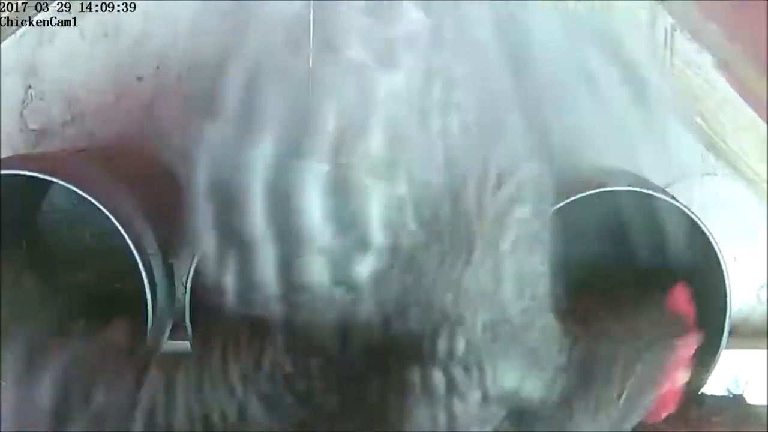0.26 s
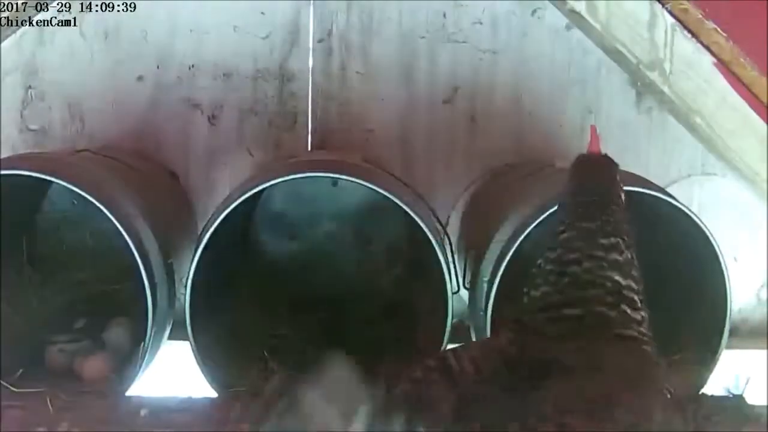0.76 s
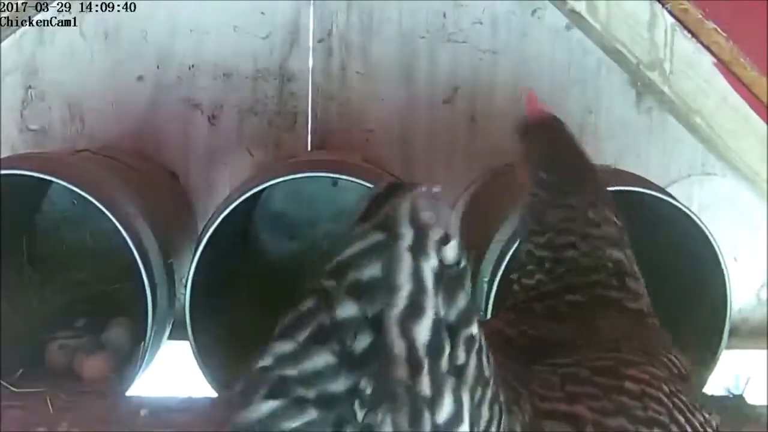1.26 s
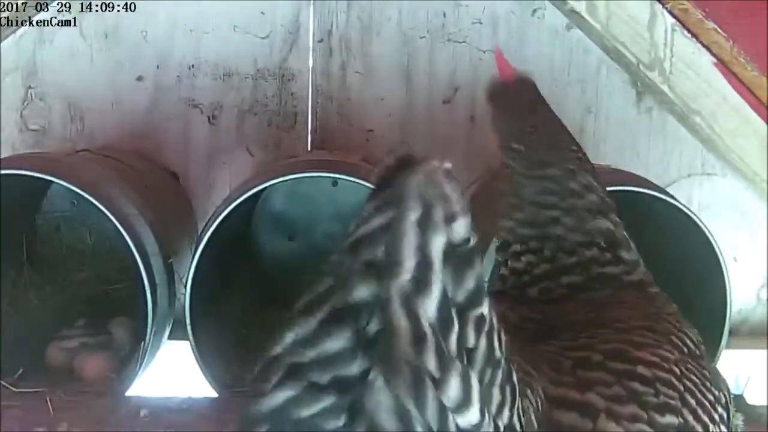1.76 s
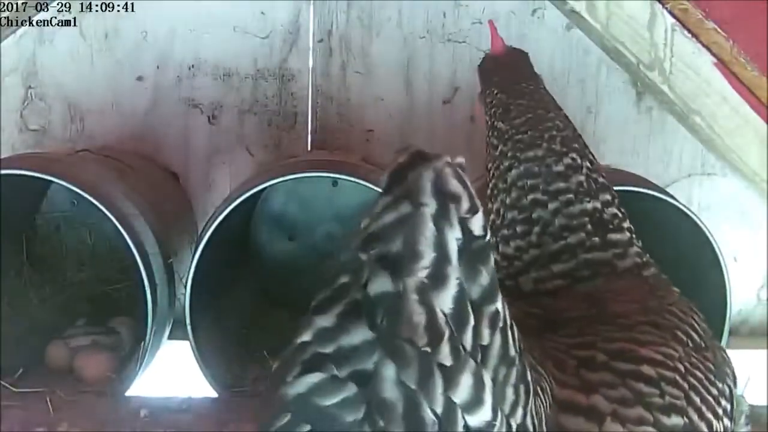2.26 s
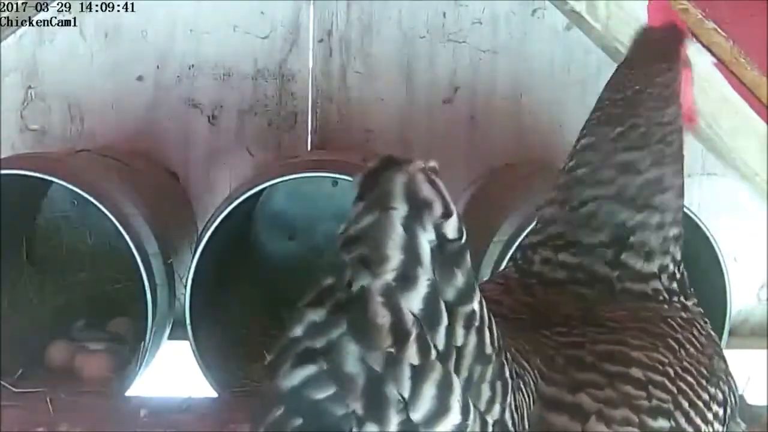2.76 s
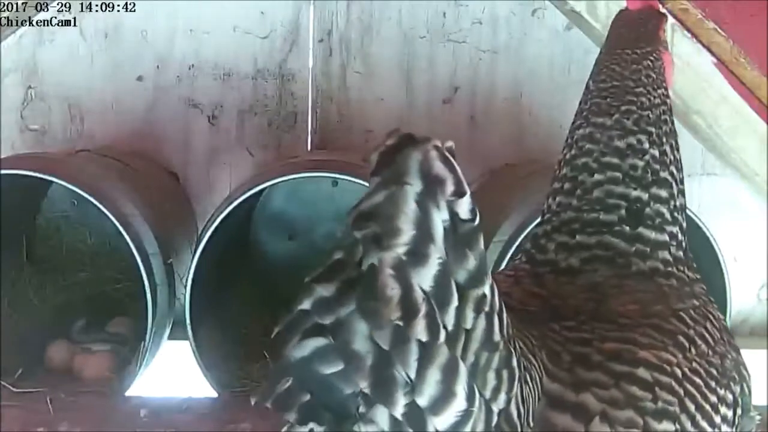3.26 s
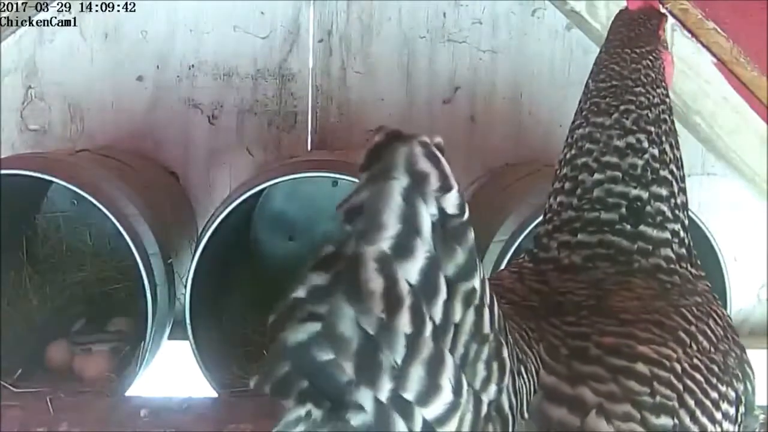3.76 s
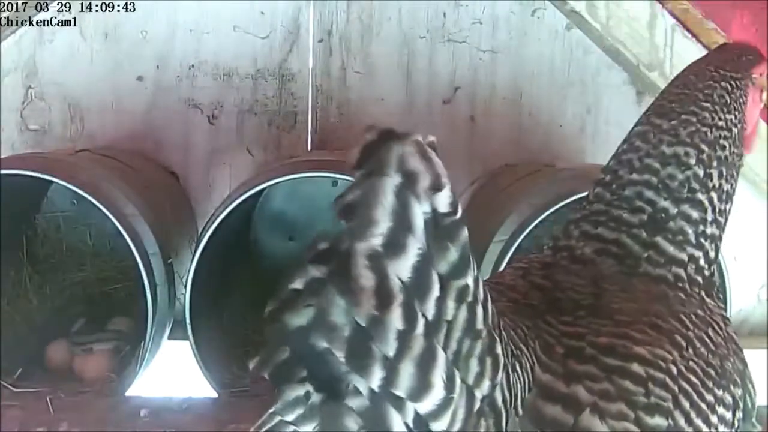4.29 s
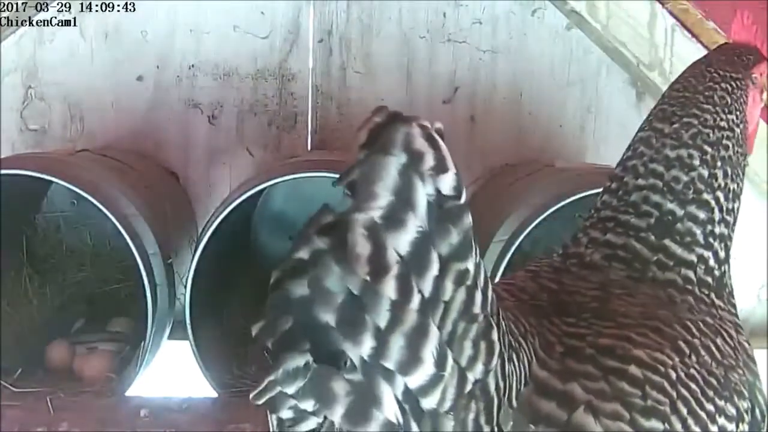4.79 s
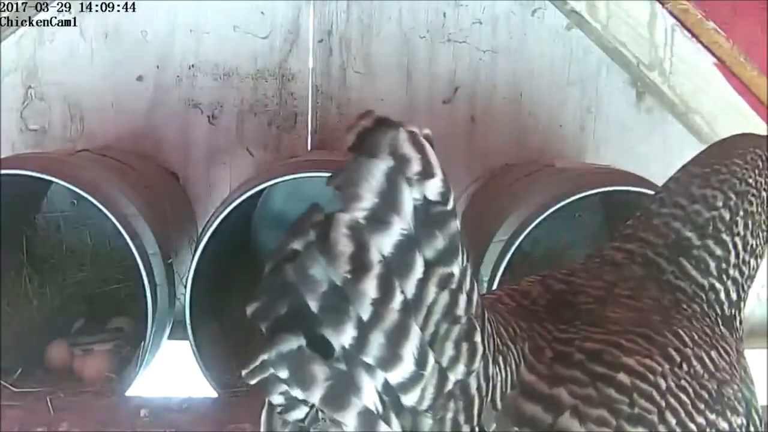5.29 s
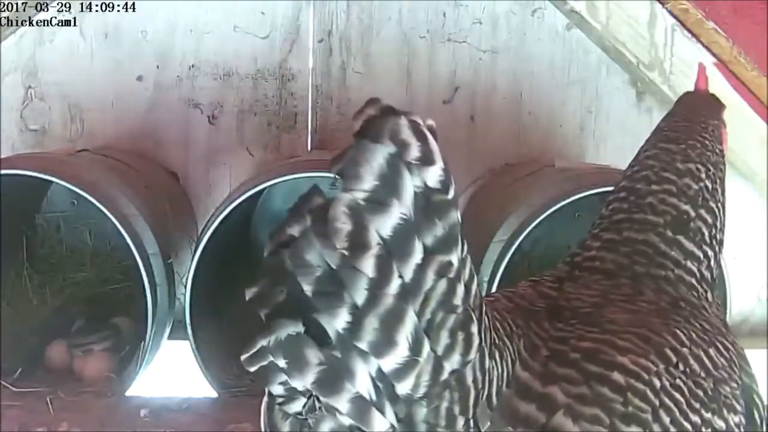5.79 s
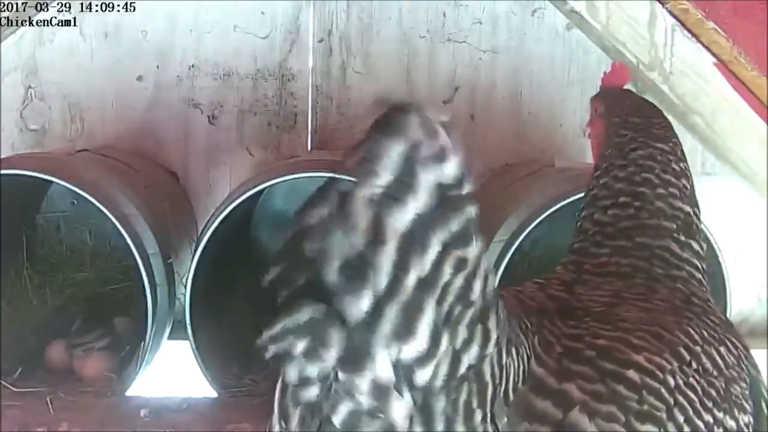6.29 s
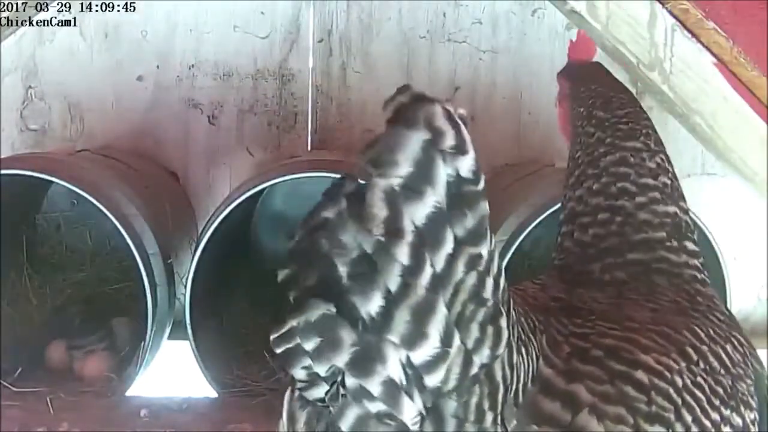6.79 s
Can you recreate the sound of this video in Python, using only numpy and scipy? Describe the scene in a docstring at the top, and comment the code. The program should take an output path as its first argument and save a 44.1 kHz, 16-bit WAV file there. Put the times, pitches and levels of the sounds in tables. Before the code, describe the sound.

In a small wooden coop, a hen close to a cheap microphone clucks about three times a second, with a loud squawk near the start. Another hen flaps past in the first second with thumps of air, feather rustle and claw knocks on wood. Brief dropouts chop the sound. Two more squawks come around the middle and near the end, while a distant bird whistles faintly over mains hum.

```python
"""Inside a small wooden coop, close to a network camera's one microphone, over mains hum and soft air noise:
a hen clucks from the start and squawks at 0.3 s, a buzz shaped by throat resonances; a second hen flaps past
until about 1.1 s, in air pulses and rustle, and claws knock on wood. From 1.3 s the stream stalls now and then,
a short mute; a squawk follows at 3.2 s, a far bird chirps in falling whistles from 3.8 to 5.9 s, and a last
squawk comes at 6.1 s. The loudest sounds overload the channel; clucks and stalls go on to the end."""
import sys
import numpy as np
from scipy import signal
from scipy.fft import rfft, irfft, next_fast_len
from scipy.io import wavfile
from scipy.ndimage import map_coordinates

SR = 44100
rng = np.random.default_rng(int(sys.argv[2]) if len(sys.argv) > 2 else 0)


def log_audio(samples):
    """Write samples as a 16-bit WAV file to the path given in sys.argv[1]."""
    # one column per channel
    frames = np.atleast_2d(samples).T
    # limit to full scale, then quantise
    limited = np.clip(frames, -1, 1)
    pcm = np.round(limited * 32767).astype(np.int16)
    wavfile.write(sys.argv[1], SR, pcm)


N = 310905
TIME = np.arange(N) / SR  # s

# Mains hum: (time [s], level [dB])
HUM_LEVEL = [(0, -61.5), (.41, -42), (.63, -28.5), (.82, -49.5), (1.6, -46.5), (2.26, -50), (2.96, -46),
             (4.2, -42.5), (4.75, -58.5), (5.42, -58), (7.05, -60.5)]
# Colour of the coop and yard noise: (frequency [Hz], relative level [dB per Hz])
AIR_COLOUR = [(35, -16.5), (60, -5.5), (114, -16), (194, -14), (254, -23.5), (575, -29), (957, -34),
              (1130, -27.5), (1320, -40.5), (1680, -29), (3480, -41), (4520, -73), (7660, -120)]
# Wild bird, far off: (time [s], peak level [dB])
CHIRPS = [(3.751, -57.5), (4.18, -51.5), (4.85, -59), (5.1, -52), (5.45, -51), (5.8, -50)]
# Pulses of air from the wings at the microphone: (time [s], pressure [full scale], half width [s])
WINGBEATS = [(.17, -0.014, 0.07), (0.479, 0.48, 0.0045), (.5, -0.18, 0.014), (0.647, 0.52, 0.0056),
             (0.666, -0.37, 0.0099), (0.799, -0.12, 0.018)]
# Air stirred past the microphone: (time [s], level [dB])
STIRRED_AIR_LEVEL = [(.08, -48.5), (.3, -49), (.43, -44), (.49, -29), (.562, -40), (.634, -26),
                     (.68, -38.5), (.834, -34), (.964, -51.5), (1.084, -35.5), (1.15, -61.5)]
# Feather rustle: (time [s], level [dB])
FEATHER_LEVEL = [(0.44, -32.5), (0.458, -33), (0.596, -41.5), (0.616, -24.5), (0.648, -36), (0.69, -44),
                 (0.7, -40)]
# Colour of the feather rustle: (frequency [Hz], relative level [dB per Hz])
FEATHER_COLOUR = [(150, -22), (250, -20), (424, -8), (590, -1), (1210, -4), (2070, 0.5), (3480, -19.5),
                  (4520, -42.5), (7660, -120)]
# Claws on the boards: (time [s], peak level [dB], decay by 60 dB [s])
CLAW_KNOCKS = [(.529, -18.5, 0.034), (.612, -13, 0.0287), (1.206, -41, 0.023)]
# Early ring of the boards: (frequency [Hz], decay by 60 dB [s])
COOP_DECAY = [(300, 0.043), (1000, 0.11), (2000, 0.098), (3500, 0.052)]
# Air mode of the open nest drums: (frequency [Hz], width [Hz], level [dB])
DRUM_MODE = (297, 24, -8.5)
# The hen's clucks, and the rough low endings of two squawks (3.343 and 6.2 s), before the shared course:
# (start [s], length [s], crest [dB], onset, first third and ending offsets [dB],
# upper resonance re lower [dB], its late change [dB], pitch [Hz], chest tone [dB], its late change [dB],
# roughness [0-1], mouth resonance [Hz])
CLUCKS = [ (-.085, .125, -13, 0, 0, -4, -8, 4, 275.6, -40, -0.5, .6, 1101),
          (0.164, .105, -10.5, 2, 2, 1, -9, 4.5, 289.3, -37, 2.5, 0.61, 1098),
          (.695, .115, -10.5, 1.5, 2, 1, -8, 4, 285.9, -38.5, 9, 0.82, 1113),
          (0.988, .11, -11, -2, -2.5, -5.5, -5.5, -3.5, 294.4, -28, -3, 0.7, 1032),
          (1.257, 0.12, -11.5, -1.5, -2.5, -4, -4.5, -1.5, 308.5, -26, -5.5, 0.55, 1071),
          (1.569, .11, -12, -1, -3, -1.5, -6.5, 0, 301.7, -24, -10, .62, 1067),
          (1.854, .112, -12.5, -3, -1, 1.5, -5.5, -6, 296.5, -25.5, 7, 0.6, 1069),
          (2.133, .117, -11, -1.5, -5, -1.5, -4.5, 3, 299.4, -24.5, 0, .5, 1065),
          (2.478, .14, -10, -2.5, -3, 1, -7.5, 3.5, 300.6, -25.5, -3.5, 0.6, 1056),
          (2.832, .112, -10.5, 0, -2.5, 1, -6, -1, 299.9, -27.5, 11, 0.39, 1044),
          (3.106, .117, -12, 0, -2.5, -5.5, -0.5, -0.5, 294, -24.5, -9.5, .6, 981),
          (3.343, .09, -12.5, 0, -7.5, -8.5, 5, -3.5, 292.5, -39, 14, .75, 1112),
          (3.887, .113, -15.5, 2.5, 0.5, 5, -0.5, 1.5, 299.1, -29.5, 13, 0.19, 987),
          (4.224, .138, -11.5, -2.5, -3.5, 1, -0.5, 0.5, 292.7, -25.5, -3.5, .5, 1000),
          (4.574, 0.12, -12.5, 0, -1, -1, -2.5, 1.5, 296, -30.5, 6, 0.83, 1017),
          (4.983, .111, -14.5, 0.5, 0, 2, -4.5, 4, 286.5, -23.5, 0.5, 0.54, 971.6),
          (5.278, .116, -16, 3.5, 1.5, 6.5, 1, -5, 301.3, -23.5, 1, 0.59, 989),
          (5.616, .109, -14, 2, 3.5, 2, -5.5, -0.5, 294, -26, 6.5, .42, 1009),
          (5.914, .125, -10.5, 0, -5, 1, -9, 7, 290.1, -25, -8, 0.86, 1014),
          (6.2, .09, -17, 0, 0.5, -4, -1.5, 1, 288.8, -33, 2, .55, 1079),
          (6.855, .104, -12, -1.5, -7, -4.5, -5, 1.5, 281.4, -33, 13.5, 0.2, 980), ]
# Course shared by those calls: (share of length [0-1], level re crest [dB], upper resonance change [dB],
# pitch [ratio], chest tone change [dB], added roughness [-], mouth resonance [ratio])
CLUCK_COURSE = [(0, -16, -2, .83, -13.5, .05, 1.0), (.11, -7.5, -3.5, .85, -11.5, .1, .99),
                (.33, 0.5, 0, .99, 1, -.12, .98), (.55, 0, 0, 1.01, -13, 0.12, 1.032),
                (.78, -7, -5.5, .96, -10, 0.22, 0.97), (1, -25.5, -7.5, .95, -22.5, 0.015, .99)]
# The three squawks, each a list of: (time [s], lower resonance [dB], upper resonance re lower [dB],
# pitch [Hz], roughness [0-1])
SQUAWKS = [
    [(.292, -15.5, 4, 568.4, .4), (.314, -3.5, -10, 619.4, .08), (.345, -5, -8, 631.8, .2),
     (.358, -6.5, -0.5, 610.5, .6), (.382, -10, 3, 602.8, .3), (.41, -11.5, 1, 606.2, .55),
     (.425, -23.5, -3, 590, 0.2), (.45, -19.5, -8, 562.2, 0.3)],
    [(3.235, -28, 5, 562, 0.2), (3.245, -15.5, 6.5, 546.7, 0.8), (3.263, -13.5, 9.5, 599.7, .2),
     (3.28, -11, 1, 583, 0.01), (3.3, -9.5, 2, 574.6, .05), (3.32, -11, 4, 573.5, .08),
     (3.35, -13.5, 4, 554.7, 0), (3.375, -17.5, 5.5, 515, 0.7)],
    [(6.084, -17.5, 1, 568.6, 0.3), (6.092, -14.5, 2.5, 572.3, 0.3), (6.12, -17, 10, 592.8, 0.02),
     (6.17, -12.5, 9, 574.6, 0.09), (6.18, -11.5, 5.5, 576.3, 0.4), (6.215, -13, 3, 555.3, 0.5),
     (6.24, -17.5, 2, 558, 0.4)],
]
# Chest tone of each squawk: (level re the whole voice [dB])
SQUAWK_CHEST_DB = [-20, -19.5, -16.5]
# Throat in clucks, as lower, upper and top resonance, each a list of: (centre [Hz], width [Hz], level [dB]);
# lower centres count from the mouth resonance, top centres from the FACING frequency
CLUCK_THROAT = [(-86, 210, 9), (172, 430, 2), (-400, 350, -8)], [(2079, 130, 4.5), (1939, 620, 1),
                (2344, 150, -6.5)], [(0, 530, 12), (830, 170, -20)]
# Throat in squawks, laid out likewise: (centre [Hz], width [Hz], level [dB])
SQUAWK_THROAT = [(0.0061, 470, 0)], [(2310, 270, 10.5), (1700, 590, 4)], [(-550, 380, -1.5), (101, 190, 1)]
# The head turns: (time [s], top resonance re lower [dB], top resonance centre [Hz])
FACING = [(0, -22, 3089), (.4, -24, 3460), (0.999, -22, 3218), (1.6, -20, 3207), (2.15, -20.5, 3118),
          (2.249, -20, 2817), (2.9, -23, 3050), (3.3, -26.5, 3460), (4, -19.5, 2700), (4.7, -18.5, 2734),
          (5.3, -24, 2837), (5.7, -21.5, 3072), (6.2, -20.5, 3400), (7, -31, 2693)]
# Stalls of the camera's stream: (start [s], end [s])
STALLS = [(1.343, 1.401), (2.303, 2.361), (2.485, 2.543), (3.924, 3.982), (4.284, 4.342), (4.583, 4.641),
          (4.823, 4.881), (6.743, 6.801), (6.983, 7.041)]

AIR_DB = -51.5  # centre of the wavering air level
UNEVEN_DB = 1  # random departure of each cluck from the shared course
ONSET_SHARE, THIRD_SHARE, TOP_SHARE, END_SHARE = 0.088, .33, .55, .78  # shares of a cluck's length
SQUAWK_MOUTH = 2.01  # mouth resonance as a multiple of the pitch
PITCH_JITTER = .04  # relative pitch waver at full roughness
ATTACK_S, RELEASE_S = .003, .0033
CONVERTER_HZ = 8000  # sample rate of the camera's converter
VOICE_BAND_HZ, TOP_HZ = 3804, 15700  # upper limits of the voice channel and of the output


def amp(db):
    """Gain of a level in dB."""
    return 10 ** (np.asarray(db) / 20)


def unit(x):
    """x at rms 1."""
    return x / np.sqrt(np.mean(x ** 2) + 1e-20)


def along(points, hz):
    """Value at hz of (Hz, value) points joined on a log frequency axis."""
    f, v = np.transpose(points)
    return np.interp(np.log(hz + 1), np.log(f + 1), v)


def level(rows):
    """Gain per sample of a (s, dB) curve, at -150 dB outside it."""
    s, db = np.transpose(rows)
    return amp(np.interp(TIME, s, db, -150, -150))


def wobble(rate, size=N, count=1):
    """Smooth random curves with rate knots a second."""
    knots = rng.standard_normal((count, int(size * rate / SR) + 4))
    position = np.arange(size) * rate / SR
    return np.squeeze([map_coordinates(row, [position]) for row in knots])


def filtered(x, response):
    """x shaped by a response given as a function of frequency."""
    m = next_fast_len(len(x) + 8192)
    spectrum = rfft(x, m) * response(np.fft.rfftfreq(m, 1 / SR))
    return irfft(spectrum, m)[:len(x)]


def noise(gain, size=N):
    """Coloured noise of rms 1."""
    return unit(filtered(rng.standard_normal(size), gain))


def resonances(modes, hz):
    """Summed gain of steep (Hz, width Hz, dB) resonances."""
    total = 0
    for centre_hz, width_hz, db in modes:
        bell = 1 / (1 + (2 * (hz - centre_hz) / width_hz) ** 2)
        total = total + amp(db) * bell ** 1.5
    return total


def add(into, sound):
    """Mix a sound into the start of a longer one."""
    into[:len(sound)] += sound


def background():
    """Mains hum wavering in level and phase, over soft air noise of drifting level."""
    phase = 2 * np.pi * 49.8 * TIME + 0.29 * wobble(4.2)
    hum = np.sqrt(2) * level(HUM_LEVEL) * amp(1.2 * wobble(18)) * np.sin(phase)
    air = amp(AIR_DB + 2.7 * wobble(3.6)) * noise(lambda f: amp(along(AIR_COLOUR, f)))
    return hum + air


def far_bird():
    """Short falling whistles whose pitch flutters fast, so that they sound hoarse."""
    out = np.zeros(N + SR)
    t = np.arange(int(.13 * SR)) / SR
    swell = np.sin(np.pi * t / t[-1]) ** 0.68
    for s, db in CHIRPS:
        hz = 2400 - 5500 * t + 70 * wobble(160, size=len(t))
        whistle = np.sin(2 * np.pi * np.cumsum(hz) / SR)
        add(out[round(s * SR):], amp(db) * swell * whistle)
    return out[:N]


def wings():
    """Each beat sends a pulse of air at the microphone; stirred air rumbles and feathers rustle."""
    pushes = sum(size * np.exp(-((TIME - s) / half) ** 2) for s, size, half in WINGBEATS)
    stirred = level(STIRRED_AIR_LEVEL) * noise(lambda f: (f > 40) / (1 + (f / 150) ** 2))
    feathers = amp(1.8 * wobble(60)) * noise(lambda f: amp(along(FEATHER_COLOUR, f)))
    return pushes + stirred + level(FEATHER_LEVEL) * unit(feathers)


def claws():
    """Dry little knocks on wood: bursts of resonant noise that die away exponentially."""
    out = np.zeros(N)
    t = np.arange(SR // 10) / SR
    for s, peak_db, t60 in CLAW_KNOCKS:
        tick = noise(lambda f: resonances([(1088, 900, 0), (2108.4, 2300, -2)], f), size=len(t))
        # the rms of the tick starts 8.5 dB below the peak level
        decay = amp(peak_db - 8.5 - 60 * t / np.clip(t60, .01, .06))
        add(out[round(s * SR):], decay * tick)
    return out


def coop(x, ring_db):
    """Close boards answer fast above the bass; a weaker ring six times as long follows."""
    hz, t, z = signal.stft(rng.standard_normal(SR // 2), SR, nperseg=256)
    t60 = along(COOP_DECAY, hz)[:, None]
    decay = amp(-60 * t / t60) + amp(ring_db - 60 * t / (6 * t60))
    tail = signal.istft(z * decay, SR, nperseg=256)[1]
    tail = filtered(tail, lambda f: 1 / (1 + (450 / (f + 1)) ** 6))
    delayed = np.pad(x, (150, 0))  # samples, about 3.4 ms
    return signal.fftconvolve(delayed, tail / np.linalg.norm(tail))[:N]


def drums(x):
    """The open nest drums hum along at their one low air mode."""
    centre_hz, width_hz, db = DRUM_MODE

    def mode(f):
        damping = 1j * f * width_hz
        return amp(db) * damping / (centre_hz ** 2 - f * f + damping)
    return filtered(x, mode)


def held_up(s):
    """Seconds lost in stalls that have ended by time s."""
    return sum((end - start) * (s >= end) for start, end in STALLS)


def cluck_course(start, length, crest_db, onset_db, third_db, end_db, upper_db, upper_late_db,
                 hz, chest_db, chest_late_db, rough, mouth_hz):
    """The shared course of throat and syrinx, stretched and set to this call's voice, a little uneven."""
    share, db, upper, pitch, chest, rougher, mouth = np.transpose(CLUCK_COURSE)
    own_shares = [ONSET_SHARE, THIRD_SHARE, TOP_SHARE, END_SHARE]
    own_db = np.interp(share, own_shares, [onset_db, third_db, 0, end_db])
    late = np.interp(share, [THIRD_SHARE, TOP_SHARE], [0, 1])
    uneven = UNEVEN_DB * rng.standard_normal((2, len(share)))
    lower_course = crest_db + db + own_db + uneven[0]
    upper_course = upper_db + upper + late * upper_late_db + uneven[1]
    chest_course = chest_db + chest + late * chest_late_db
    return np.transpose([start + length * share, lower_course, upper_course, hz * pitch,
                         chest_course, rough + rougher, mouth_hz * mouth])


def squawk_course(rows, chest_db):
    """Chest tone follows the level of the whole voice, and the mouth resonance follows the pitch."""
    s, low_db, upper_db, hz, rough = np.transpose(rows)
    whole_db = low_db + 10 * np.log10(1 + amp(upper_db) ** 2)
    return np.transpose([s, low_db, upper_db, hz, whole_db + chest_db, rough, SQUAWK_MOUTH * hz])


def call(rows, throat):
    """The syrinx buzzes at the pitch; as it roughens, cycles waver and break into flickering half-pitch partials."""
    s, *cols = np.transpose(rows)
    t = np.arange(s[0], s[-1], 1 / SR)
    low_db, high_db, hz, chest_db, rough, mouth_hz = [np.interp(t, s, c) for c in cols]
    turn_s, *turns = np.transpose(FACING)
    top_db, top_hz = [np.interp(t, turn_s, c) for c in turns]
    rough = np.clip(rough, 0, 1)
    wavering_hz = hz * (1 + PITCH_JITTER * rough * wobble(120, size=len(t)))
    phase = 2 * np.pi * np.cumsum(wavering_hz) / SR

    # partials at 1.5, 2, 2.5... times the pitch; the chest tone is the fundamental
    k = np.arange(3, 2 + CONVERTER_HZ // min(hz))[:, None] / 2
    start = rng.uniform(0, 2 * np.pi, k.shape)
    steady = (k % 1 == 0) * np.cos(k * phase + start)
    flicker = wobble(.4 * np.mean(hz), size=len(t), count=len(k)) * np.sin(k * phase + start)
    out = amp(chest_db) * np.sin(2 * np.pi * np.cumsum(hz) / SR)

    levels_db = (low_db, low_db + high_db, low_db + top_db)
    for modes, db, zero_hz in zip(throat, levels_db, (mouth_hz, 0, top_hz)):
        gains = resonances(modes, k * hz - zero_hz) * (k * hz < CONVERTER_HZ / 2)
        # gains[1::2] are the whole multiples of the pitch
        buzz = np.sum(gains * steady, 0) / np.linalg.norm(gains[1::2], axis=0)
        rasp = np.sum(gains * flicker, 0) / np.linalg.norm(gains, axis=0)
        out += amp(db) * (np.sqrt(1 - rough) * buzz + np.sqrt(rough) * rasp)
    fade_in = np.clip((t - t[0]) / ATTACK_S, 0, 1)
    fade_out = np.clip((t[-1] - t) / RELEASE_S, 0, 1)
    return np.sqrt(2) * out * fade_in * fade_out


def hen():
    """The near hen's clucks and squawks as voiced, placed on a clock without the stalls."""
    voice = np.zeros(N + SR)
    clucks = [cluck_course(*row) for row in CLUCKS]
    squawks = [squawk_course(rows, db) for rows, db in zip(SQUAWKS, SQUAWK_CHEST_DB)]
    for calls, throat in ((clucks, CLUCK_THROAT), (squawks, SQUAWK_THROAT)):
        for rows in calls:
            sound = call(rows, throat)
            first = round((rows[0][0] - held_up(rows[0][0])) * SR)
            add(voice[max(first, 0):], sound[max(-first, 0):])  # the first cluck is already under way
    return voice[:N]


def scene():
    """Everything at the single microphone; a call caught by a stall goes on after it."""
    voice, bird = hen(), far_bird()
    near = voice + amp(-7) * coop(voice, ring_db=-34.0) + drums(voice)
    stalled = np.arange(N) - np.round(held_up(TIME) * SR).astype(int)
    near = near[stalled]
    far = bird + amp(1.0) * coop(bird, ring_db=-13.5)  # echoes 1 dB over the direct sound
    return (near + far + wings() + claws() + background())[None]


def record(dry):
    """The input saturates, stalls mute it, a slow converter folds overtones back and the peaks clip."""
    squeezed = dry[0] / (1 + np.abs(dry[0] / 0.99) ** 6) ** (1 / 6)
    live = np.ones(N)
    for start, end in STALLS:
        away = np.abs(TIME - start)
        fading = amp(-30 - 900 * away) + amp(-9000 * away)  # a quick drop and a weak slower tail
        live = np.where((TIME > start) & (TIME < end), fading, live)
    ticks = np.arange(0, N / SR, 1 / CONVERTER_HZ)
    samples = map_coordinates(squeezed * live, [ticks * SR])
    samples *= 1 + amp(-32.0) * rng.standard_normal(len(ticks))  # grainy noise that grows with the sound
    resampled = signal.resample(samples, round(len(ticks) * SR / CONVERTER_HZ))[:N]
    band = filtered(resampled, lambda f: 1 / (1 + (f / VOICE_BAND_HZ) ** 30))
    played = np.clip(band, -.99, .99) + amp(-91) * rng.standard_normal(N)  # faint hiss
    return filtered(played, lambda f: f < TOP_HZ)[None]


dry = scene()
out = record(dry)
log_audio(out)
```